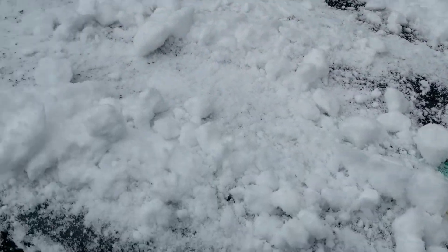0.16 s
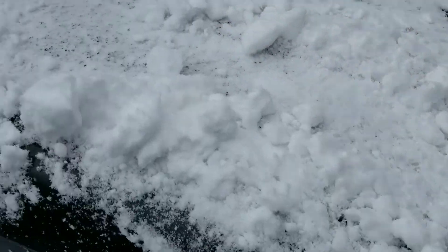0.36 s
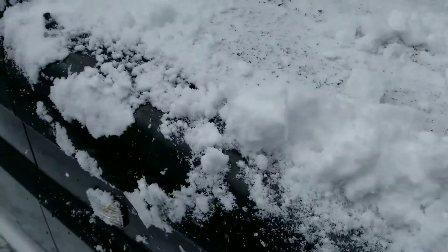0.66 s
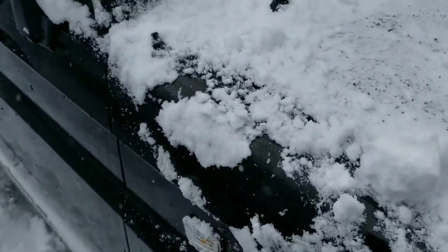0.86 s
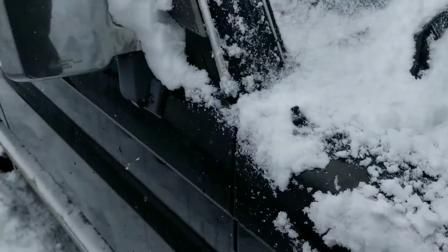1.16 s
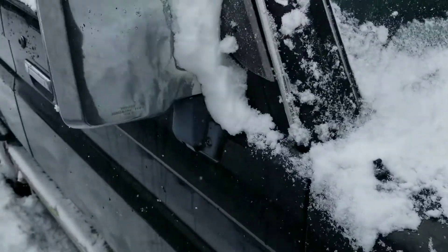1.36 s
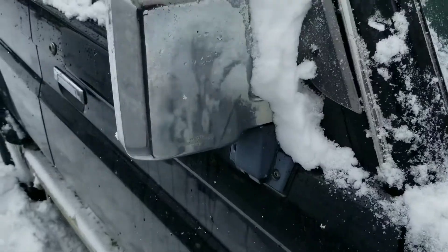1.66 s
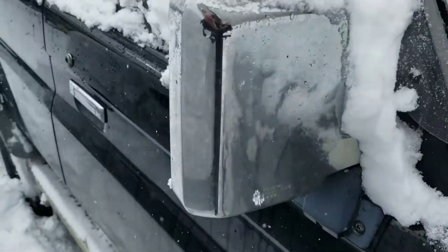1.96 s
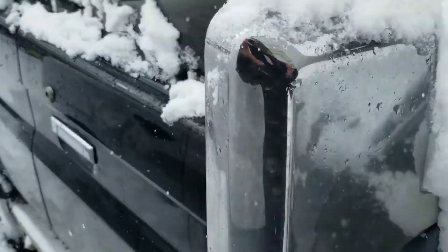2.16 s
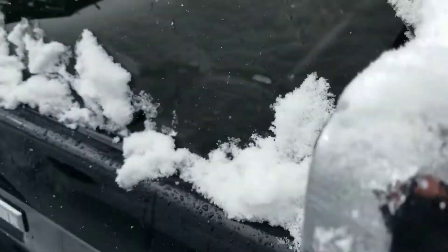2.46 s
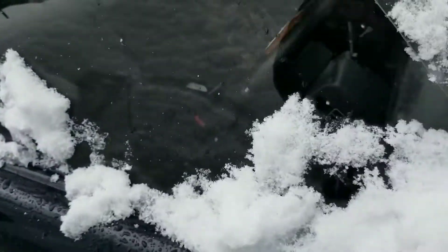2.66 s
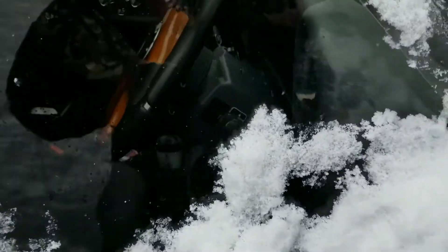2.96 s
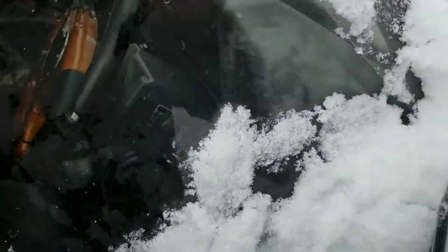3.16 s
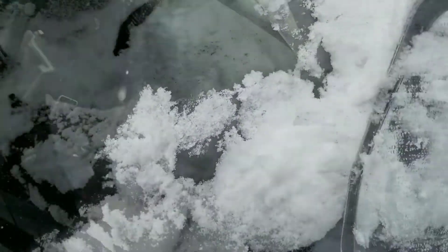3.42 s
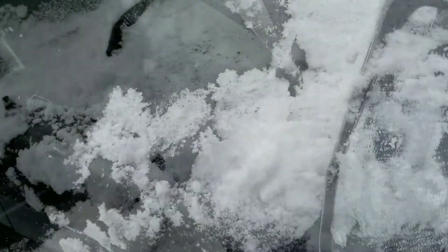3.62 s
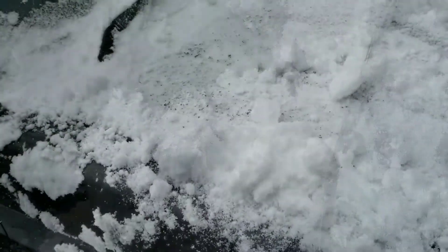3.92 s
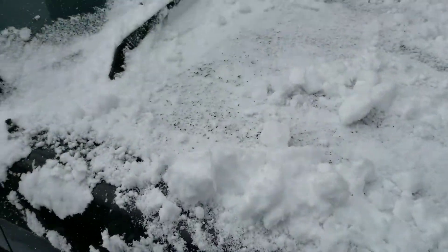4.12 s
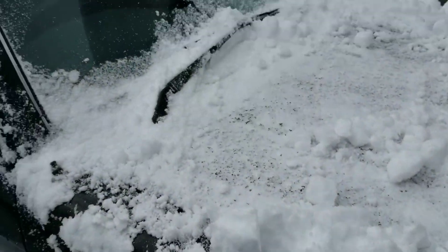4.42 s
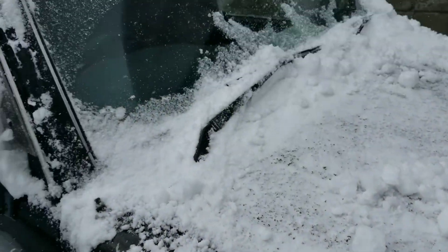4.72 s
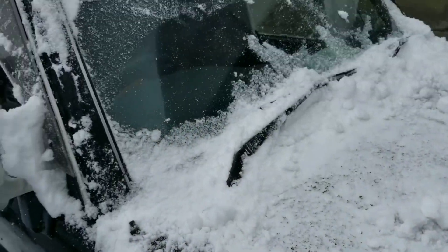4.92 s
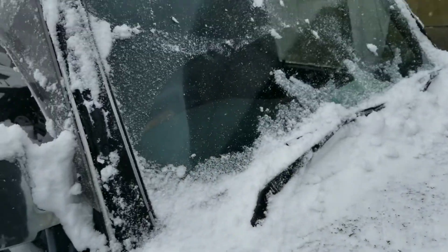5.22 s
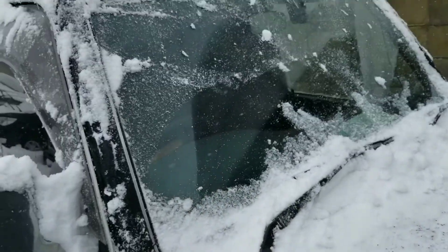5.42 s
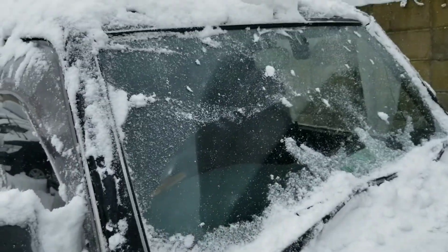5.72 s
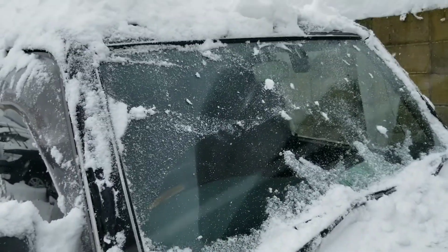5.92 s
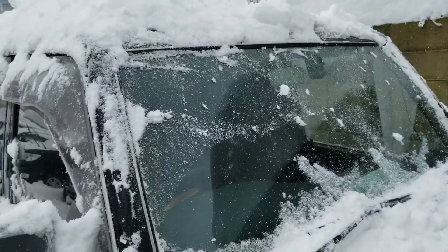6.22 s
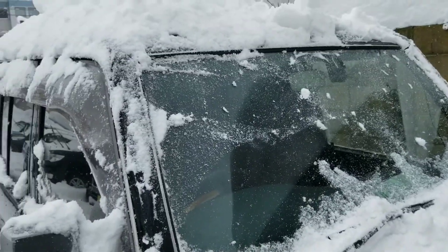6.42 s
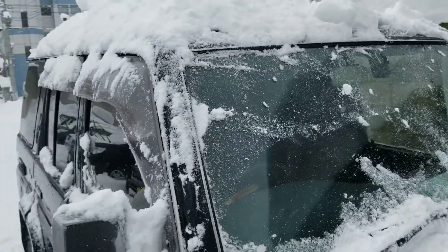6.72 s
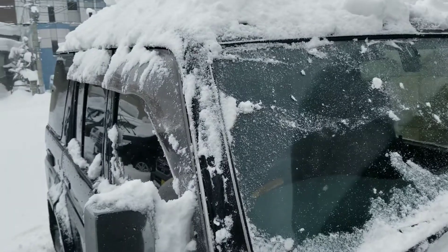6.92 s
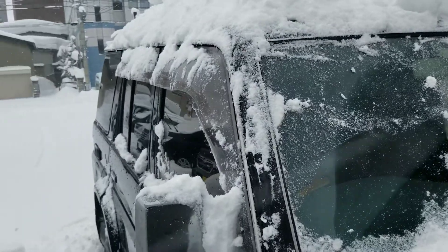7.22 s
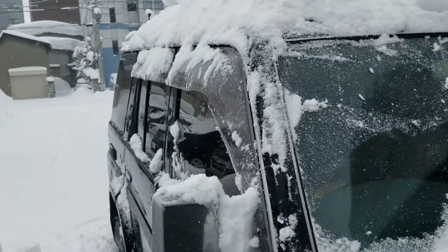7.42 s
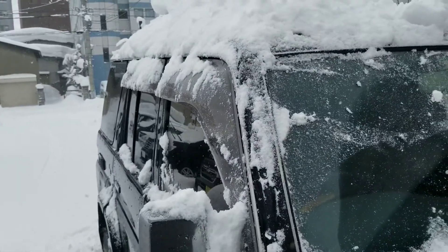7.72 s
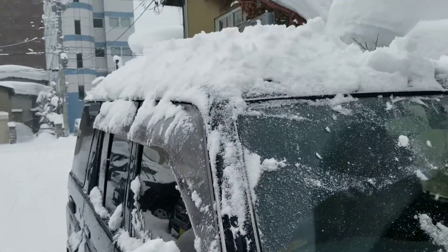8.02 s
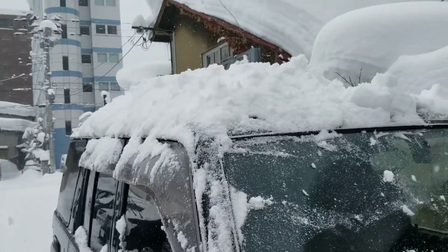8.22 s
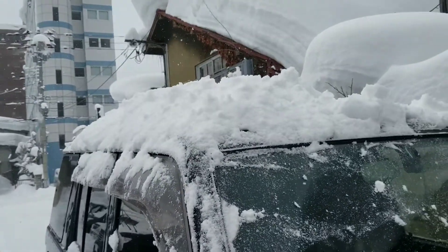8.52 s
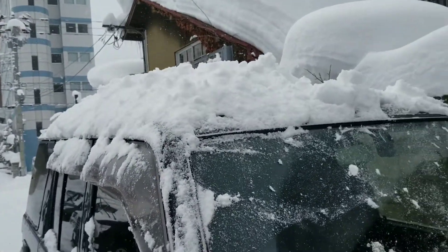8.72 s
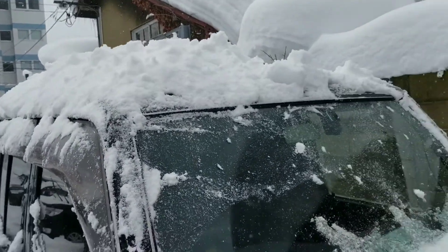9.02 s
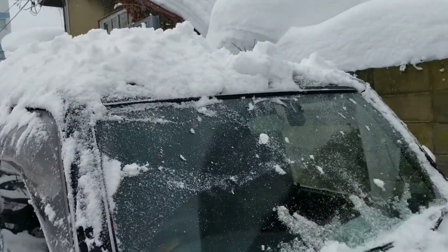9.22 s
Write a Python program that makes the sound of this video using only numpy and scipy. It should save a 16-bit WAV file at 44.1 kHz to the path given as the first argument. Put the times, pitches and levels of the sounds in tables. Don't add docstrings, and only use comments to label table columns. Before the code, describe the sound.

A four-cylinder engine idles outdoors throughout, about twenty-five firings per second, each a low exhaust thump, a ringing metallic knock and a puff of intake hiss, with slightly uneven strengths. From 0 to 1.2 seconds the handheld stereo microphones are over the bonnet, close and clattery; by 2.0 they are beside the door, the knocks softer and more blurred, the tone shifting as the hand tilts. Light finger taps fall near 2.05, 2.46, 3.1 to 3.25 and 3.5. At 3.61 a tiny silence marks a scene change. From 3.64 to 3.8 hard, dull, distorted blows hit the right side, the strongest around 3.77, with rubbing that slides briefly left and fades. The engine continues noticeably quieter, with small grip bumps and momentary bass thinning, until about 6.0, when its level steps up and climbs to full by about 6.8. The idle then runs steadily to the end near 9.4.

```python
import sys
import numpy as np
from scipy import signal
from scipy.fft import rfft, irfft
from scipy.io import wavfile
from scipy.ndimage import uniform_filter1d

SR = 44100
rng = np.random.default_rng(int(sys.argv[2]) if len(sys.argv) > 2 else 0)


def makeup_ratio(level_db):
    decades = np.asarray(level_db, float) / 20
    return 10 ** decades


def transcribe(signal):
    frames = np.atleast_2d(signal).T
    limited = np.clip(frames, -1, 1)
    pcm = np.round(limited * 32767).astype(np.int16)
    wavfile.write(sys.argv[1], SR, pcm)


N = 413216
FIRING_HZ = 25.47
FIRST_FIRING_S = (.0325, 3.6237)
GAP_S = (3.6106, 3.6326)


def firings(t):
    before = t < GAP_S[1]
    return FIRING_HZ * (t - np.where(before, *FIRST_FIRING_S)) + np.where(before, 4, 200)


# multiple of the firing rate [1], level/dB at the three places
EXHAUST = [(1, -12.5, -7, -13), (2, -2, 0.5, 0.5), (3, -6.5, -13, -8), (4, -3.5, -11, -7),
           (5, -11.5, -15, -11.5), (6, -16, -16.5, -23.5), (7, -12, -17, -16), (8, -19.5, -65, -44),
           (9, -49, -14.5, -48), (10, -21.5, -13, -22.5), (12, -16.5, -41, -17.5), (13, -32, -17.5, -54),
           (14, -50, -15.5, -21.5), (15, -32, -23, -61), (19, -56, -27, -20.5), (20, -31, -22.5, -20),
           (22, -44, -28, -20.5)]


def exhaust(cycles, thump_db, rumble_db):
    out = np.zeros((2, N))
    for k, *place_db in EXHAUST:
        low = k < 3
        if low:
            base_db, waver_db, lateness = thump_db + 3.5, by_place([1.5, 1.5, 2.6]), 1
        else:
            base_db, waver_db, lateness = rumble_db + 7.5, 3.0 if k < 18 else 1.2, .07
        gain = makeup_ratio(by_place(place_db) + base_db + waver_db * drift(5.7))
        turn = k * cycles + .11 * k * (k - 1) * lateness + .014 * np.sqrt(k) * drift(2.5)
        lag = np.outer([k * FIRING_HZ, 0], by_place(LEFT_LAG_S))
        out += gain * np.cos(2 * np.pi * (turn - lag))
    return out


# f/Hz, level/dB per Hz
RUMBLE = [(18, -47), (30, -39), (65, 5.5), (220, -7), (378, -12), (442, -12.5), (502, -5), (649, -29.5),
          (900, -17), (1170, -50), (1980, -120)]


def rumble(cycles):
    def swell(hz):
        return beat(cycles, 0.0053, 0.005, 1.0, 6.0) * makeup_ratio(2.25 * drift(1.75))
    return banded_noise(RUMBLE, swell, per_octave=2)


# f/Hz, width [Hz], level/dB at the three places
BLOCK = [(288.3, 26, -1.5, 6, -7), (375.6, 45, 0, 1.5, 1), (499.7, 21.5, -5, -9, -3),
         (580, 93, -8.5, -8, -11.5), (797.2, 36, -6.5, -3, -8), (1018, 26, -20.5, -5, -8.5),
         (1251, 57, -8, -37, -17), (1344, 140, -10, -38, -29), (1429, 42, -7.5, -13.5, -8.5),
         (1586, 37, -12.5, -9, -12.5), (1750, 78, -48, -7.5, -26), (1918, 55, -14.5, -7.5, -9.5),
         (2040, 190, -33, -28, -29), (2196, 69, -12.5, -7.5, -15.5), (2340, 93, -12, -6.5, -17.5),
         (2531, 55, -14.5, -11, -15), (2560, 210, -16, -24, -17.5)]
# f/Hz, level/dB per Hz
CLATTER = [(350, -5), (600, 4.5), (1000, -1.5), (1110, 2.5), (1330, 1.5), (1760, -1.5), (1940, 5.5),
           (3400, -36), (4420, -52), (7480, -120)]
# f/Hz, lead [firing cycles]
KNOCK_LEAD = [(400, -.13), (600, -.11), (900, -.01), (1300, .075), (2200, .02)]
RING_DB = [-4.5, -1, -4]
TICK_SHARE = [.4, .15, .35]


def knock(cycles):
    rings, blur = 0, by_place([.65, 2.3, .75])
    for hz, width_hz, *place_db in BLOCK:
        late = cycles - rng.uniform(-.02, .04) + at_hz(KNOCK_LEAD, hz)
        blows = np.diff(np.floor(late), prepend=3) == 1
        steady = .8 * np.exp(-(np.log(hz / 560) / .5) ** 2)
        envelope = beat(late, .0011, .007, .08 * blur, 1.5, hz)
        burst = rms_one(rng.standard_normal((3, N)) * envelope * makeup_ratio(1.2 * drift(4.0)))
        shake = (1 - steady) * burst + steady * rms_one(blows * strengths(late, 1.5))
        if hz > 900:
            sign = rng.choice([-1, 1], 400)[late.astype(int)]
            tick = blows * sign * strengths(late, 5.5) * hardness(late, hz)
            share = by_place(TICK_SHARE)
            shake = (1 - share) * shake + share * rms_one(tick)
        ringing = resonance(resonance(shake, hz, width_hz), hz, 4 * width_hz)
        stereo = rms_one(pair(ringing[0], ringing[1:], hz))
        rings = rings + makeup_ratio(by_place(place_db)) * reflection(hz) * stereo

    def rattle(hz):
        return beat(cycles + at_hz(KNOCK_LEAD, hz), .0015, .012, .36 * blur, 3.2, hz) * reflection(hz)
    broad = banded_noise(CLATTER, rattle, per_octave=4)
    return (makeup_ratio(by_place(RING_DB)) * rings + makeup_ratio(-0.5) * broad) * makeup_ratio(0.78 * drift(4.9))


CYLINDER_DB = [-0.9, -1.15, -0.59, -0.4]


def strengths(cycles, uneven_db):
    chance = np.clip(rng.standard_normal(400), -1.8, 1.8)
    return makeup_ratio(np.tile(CYLINDER_DB, 100) + uneven_db * chance)[cycles.astype(int)]


# lower block level/dB, upper block level/dB
CYLINDER_COLOUR = [
    [(0.5, 0), (-.8, -2), (-2, -4.7), (-0.5, 0)],
    [(0.5, 3), (-1, 1.5), (1.3, 1.5), (0.7, 0.5)],
]
# t/s, lower block level/dB, upper block level/dB
HARD_FIRINGS = [(0.032, 3, -0.5), (0.072, 1, -7), (0.19, 5.5, 0), (0.268, 2.5, -2), (0.386, -2, 0),
                (0.425, 3, -5.5), (0.504, 3.5, 1.5), (0.582, 3.5, 5), (0.7, -4.0, 2), (0.739, 3.5, 3.5),
                (0.896, 0, 3.5), (1.014, -2, 2), (1.053, 0.0, -1), (1.132, -0.5, 0.5), (1.25, 0.0, -0.5),
                (1.367, 0, -2), (1.407, -6, -2.5), (1.446, 0, 2.0), (1.485, -9, 1.0), (1.524, 2.5, 3),
                (1.603, 2, 5.5), (1.681, 4.5, -5), (1.76, 4, 3), (1.878, -8, -1), (1.996, 2.5, -0.5),
                (2.035, -6, -3), (2.074, -11, -1), (2.113, -5.0, 1.5), (2.231, 2, 2.5), (2.27, 2.5, -1.5),
                (2.31, -2, -4.5), (2.427, 4, 2.5), (2.545, 4, -2), (2.585, 1, 2.0), (2.624, -6, -5.5),
                (2.663, -2.5, -6.0), (2.702, -1, -5.5), (2.859, 0, 2.0), (2.899, -6, 2.5), (3.056, -5, 3.5),
                (3.095, 3, 4.0), (3.134, 4.0, 0), (3.409, 5, 0), (3.448, 0.5, -5), (3.527, 1.0, 3.5)]
# t/s, lower block level/dB, upper block level/dB
LATER_HARD_FIRINGS = [(3.899, 4, 3.5), (3.938, 0, 3.5), (4.016, 4.5, -4.0), (4.134, -1, 2.5), (4.173, 3, 0),
                      (4.213, 2.0, 3), (4.252, 2, 0), (4.291, 0, 2), (4.33, 5.5, 3.5), (4.487, 1.5, 1),
                      (4.684, 4, 0.0), (4.723, 5.5, 3.5), (4.841, 2, -4.0), (4.88, 0, 2.5),
                      (5.037, -0.5, 4), (5.076, 1, 5.5), (5.194, 1, 6.5), (5.273, 3.5, -8),
                      (5.39, 1.5, 2.5), (5.43, 2.5, -5.5), (5.665, 0, 1.0), (5.744, 3.5, -2),
                      (5.783, 1, 5.5), (5.901, 2, -6.0), (6.019, 0, -5.5), (6.136, -2, 4.5),
                      (6.215, 2.5, 1.5), (6.294, -3, 3), (6.411, 1.5, 1), (6.529, 1, -1), (6.568, 0.0, 3.0),
                      (6.608, 0, 3.5), (6.765, 0.5, 7.5), (6.843, -2.5, -2), (6.922, 3, 3), (7.314, 0, -2),
                      (7.354, 3, -2), (7.432, 2.5, 1.5), (7.628, 0.5, -4.5), (7.668, 4, 3), (7.707, -3, 2),
                      (7.785, -1.5, -2.5), (7.864, -4, -1), (7.982, 1.5, -1.0), (8.021, 0, 2),
                      (8.06, 3.5, 3.0), (8.139, 2, 0), (8.178, -1, 2.5), (8.296, 2.5, 2), (8.335, 2.5, 4),
                      (8.374, -2, 1), (8.414, 4, 3), (8.571, 3, -3.0), (8.649, -2, 4.5), (8.688, -1, 2.5),
                      (8.728, 1, -6), (8.806, -4, 0.0), (8.846, 0, 5.5), (8.885, 3.5, 2), (9.199, 4, 2)]


def hardness(cycles, hz):
    upper, count = int(hz > 1700), np.arange(400)
    extra_db = np.array(CYLINDER_COLOUR)[(count >= 200) * 1, count % 4, upper]
    s, *hard_db = np.vstack([HARD_FIRINGS, LATER_HARD_FIRINGS]).T
    extra_db[np.round(firings(s)).astype(int)] = 1.84 * hard_db[upper]
    return makeup_ratio(extra_db)[cycles.astype(int)]


def beat(cycles, rise_s, fall_s, between, uneven_db, hz=0):
    since = cycles % 1 / FIRING_HZ
    hard = hardness(cycles, hz) if hz > 900 else 1
    pulse = (1 - np.exp(-since / rise_s)) ** 2 * np.exp(-since / fall_s)
    return between + hard * strengths(cycles, uneven_db) * pulse


# t/s, favoured f/Hz
REFLECTION = [
    (0.0, 1510),
    (0.63, 1490),
    (0.8, 1780),
    (1.23, 1520),
    (2.19, 1970),
    (2.33, 1640),
    (2.44, 2000),
    (3.54, 1940),
    (3.6, 2150),
]


def reflection(hz):
    s, favoured_hz = np.transpose(REFLECTION)
    t = np.arange(0, N, 256) / SR
    octaves_off = np.log2(hz / np.interp(t, s, favoured_hz))
    lift = np.exp(-(octaves_off / 0.16) ** 2)
    lift_db = by_place([0.5, 4.5, -0.3])[::256] * lift
    return np.interp(np.arange(N) / SR, t, makeup_ratio(lift_db))


# f/Hz, level/dB per Hz
RUB_COLOUR = [(24, -50), (40, 13), (247, -2.5), (395, -18), (446, -19), (923, -28), (1090, -43),
              (1500, -29), (1950, -65), (3300, -120)]


def rubbing():
    t, let_go_s = np.arange(N) / SR, 0.1
    since = t - 3.8
    rub_db = -30 - 5 * np.clip(since / let_go_s, 0, 1) - 6.5 * np.clip(since, 0, None)
    pan_db = np.interp(since / let_go_s, [0, .3, .7, 1.3], [-17, 8, 8, -2])
    colour = makeup_ratio(at_hz(RUB_COLOUR, np.linspace(1, SR / 2, N // 2 + 1)))
    spectrum = rfft(rng.standard_normal((2, N))) * colour
    lumps = makeup_ratio(4 * np.tanh([drift(30.0), drift(30.0)]))
    out = rms_one(irfft(spectrum, N) * lumps) * makeup_ratio(rub_db + np.outer([.5, -.5], pan_db))
    return out * np.clip((t - GAP_S[1]) / .04, 0, 1) ** 2


# t/s, peak level/dB, f/Hz, push 1 or pull -1
TAPS = [(2.016, -25, 795, -1), (2.045, -25.5, 755, -1), (2.057, -35, 800, 1), (2.079, -33, 846, 1),
        (2.087, -32, 746, 1), (2.459, -36, 850, 1), (2.459, -30, 1950, 1), (3.1115, -25.5, 770, 1),
        (3.145, -29, 420, -1), (3.1108, -23, 230, -1), (3.14, -21, 199, -1), (3.533, -38, 5500, 1),
        (3.208, -21, 214, 1), (3.23, -21, 165, 1), (3.241, -22.5, 166, 1), (3.533, -37, 2040, 1)]
# t/s, peak level/dB, f/Hz, push 1 or pull -1, length [cycles]
BLOWS = [(3.6361, -15, 170, 1, .2), (3.639, -11, 100, -1, .25), (3.6458, -11, 170, 1, .2),
         (3.646, -24, 450, 1, .3), (3.651, -23, 130, -1, .4), (3.6875, -20, 105, 1, 1.1),
         (3.659, -24, 90, 1, .3), (3.6787, -24, 220, 1, .4), (3.682, -26, 150, -1, .3),
         (3.7035, -22, 250, 1, .3), (3.7165, -25, 250, 1, .4), (3.7225, -23, 150, -1, .4),
         (3.726, -24, 140, 1, .3), (3.7368, -24, 220, -1, .3), (3.6999, -18, 150, -1, .5),
         (3.735, -20, 400, 1, .9), (3.7485, -25, 600, 1, .6), (3.7522, -22, 300, -1, .4),
         (3.756, -23, 130, 1, .4), (3.7607, -19, 200, -1, .3), (3.7745, -14, 250, 1, .3),
         (3.768, -11, 70, 1, .35), (3.785, -20, 140, 1, .6), (3.764, -11, 200, -1, .4),
         (3.7632, -33, 1300, 1, .9), (3.7712, -26, 1500, 1, .9), (3.767, -34, 1500, 1, 1.2),
         (3.7703, -15, 500, -1, .25), (3.7724, -10, 330, -1, .25), (3.7736, -14.5, 400, -1, .25),
         (3.7769, -11.5, 200, -1, .3), (3.792, -24, 250, -1, .5), (3.7956, -30, 1100, 1, .5),
         (3.801, -24, 130, 1, .4), (3.7975, -21, 200, -1, .6), (3.812, -36, 500, 1, 1.1),
         (3.852, -34, 450, 1, 1.3), (3.853, -40, 900, 1, .5), (3.7515, -33, 1200, 1, 1.1)]
# t/s, peak level/dB, f/Hz, left over right level/dB
SETTLING = [(3.661, -29, 230, 20), (3.794, -24.5, 240, 14), (3.801, -25, 150, 17), (3.832, -39, 545, 12),
            (3.8188, -30, 170, 23), (3.842, -36, 90, 23), (3.8653, -25.5, 115, 25), (3.905, -48, 1290, 10),
            (3.83, -45, 2200, 0), (3.915, -29.5, 365, -4), (4.023, -27, 127, 1), (4.077, -45, 300, -11),
            (4.136, -44, 200, -3), (4.165, -29.5, 69.5, 3), (4.332, -35, 110, -2), (4.499, -33, 88, -1),
            (4.56, -36, 141, 15), (4.68, -42, 90, 2), (4.86, -41, 800, 7), (5.04, -41.5, 400, 11),
            (5.17, -40, 130, 15), (5.189, -38.5, 109, 12), (5.227, -36, 60, 5), (5.869, -42, 730, -32),
            (6.41, -40, 800, 6)]


def bumps():
    out, t = np.zeros((2, N)), np.arange(-2000, 2000) / SR
    events = [(*row, 0.66, 0) for row in TAPS]
    events += [(*row, -35) for row in BLOWS]
    events += [(s, db, hz, 1, 0.73, pan_db) for s, db, hz, pan_db in SETTLING]
    for s, peak_db, hz, push, cycles, pan_db in events:
        swing = np.cos(2 * np.pi * hz * t) * np.exp(-(hz * t / cycles) ** 2)
        turns = 2.3 * hz * t
        swing += makeup_ratio(-12) * np.cos(2 * np.pi * turns) * np.exp(-(turns / .55) ** 2)
        louder_db = 8.0 - np.clip([[-pan_db], [pan_db]], 0, None) - 6 * np.exp(-abs(pan_db) / 8)
        at = round(s * SR)
        out[:, at - 2000:at + 2000] += np.sign(push) * makeup_ratio(peak_db + louder_db) * swing
    return out


# f/Hz, level/dB per Hz
HISS = [(1650, 0.5), (2800, 3), (3870, -4), (4830, -5), (6680, -12), (8110, 8.5), (8840, -5.5),
        (10500, -4.5), (12600, -1), (14900, -8.5), (15600, -14)]
# f/Hz, width [Hz], level/dB
TINKLE = [(4820, 1630, -2), (10600, 400, -14)]
# t/s, share of the top of the hiss lost [1]
HISS_TOP_LOSS = [(0, -0.065), (.5, .1), (3.1, -0.045), (3.3, -0.55), (3.6, -0.51), (3.64, 0.0074),
                 (6.6, 0.4), (7, 0.065), (8, .2), (9.4, 0.6)]


def hiss(cycles):
    early = cycles + .24

    def swell(hz=0):
        rise = (early % 1) ** .75
        return 1.82 + strengths(early, 5.9) * np.sin(np.pi * rise) ** 4 * makeup_ratio(2.9 * drift(30.0))
    air = banded_noise(HISS, swell)
    top = signal.sosfiltfilt(signal.butter(2, 12300, "high", fs=SR, output="sos"), air)
    air = air - in_time(HISS_TOP_LOSS)[0] * top
    parts = 0
    for hz, width_hz, db in TINKLE:
        shaken = rng.standard_normal((2, N)) * swell()
        parts = parts + makeup_ratio(db) * rms_one(resonance(shaken, hz, width_hz))
    return (air + makeup_ratio(-6.0) * rms_one(parts)) * makeup_ratio(1.17 * drift(45.0))


def banded_noise(spectrum, envelope, per_octave=3):
    low_hz, high_hz = spectrum[0][0], spectrum[-1][0]
    edges = np.geomspace(low_hz, high_hz, int(per_octave * np.log2(high_hz / low_hz)) + 2)
    out, white = 0, rng.standard_normal((2, 3, N))
    for k, (low, high) in enumerate(zip(edges, edges[1:])):
        band = signal.sosfilt(signal.butter(2, [low, high], "band", fs=SR, output="sos"), white[k % 2])
        hz = np.sqrt(low * high)
        out = out + makeup_ratio(at_hz(spectrum, hz)) * envelope(hz) * pair(band[0], band[1:], hz)
    return rms_one(out)


def resonance(x, hz, width_hz):
    r = np.exp(-np.pi * width_hz / SR)
    feedback = [1, -2 * r * np.cos(2 * np.pi * hz / SR), r * r]
    return signal.lfilter(np.array([1, 0, -1]) * (1 - r * r) / 2, feedback, x)


# f/Hz, shared part [0-1]
LIKENESS = [(50, .98), (130, .85), (300, .78), (640, .68), (1400, .62), (3000, .42), (8000, .38)]
LEFT_LAG_S = [.00012, .00025, 0.00013]


def pair(shared, own, hz):
    alike = np.clip(at_hz(LIKENESS, hz), 0, 1)
    late = np.interp(np.arange(N) - by_place(LEFT_LAG_S) * SR, np.arange(N), shared)
    return np.sqrt(alike) * np.array([late, shared]) + np.sqrt(1 - alike) * own


# t/s, place [0 over the bonnet, 1 beside the door, 2 a step back]
PLACE = [
    (0, 0),
    (1.2, 0),
    (2.0, 1),
    (3.61, 1),
    (3.632, 2),
    (9.4, 2),
]


def by_place(values):
    s, place = np.transpose(PLACE)
    return np.interp(np.arange(N) / SR, s, np.interp(place, range(3), values))


def drift(rate):
    r = np.exp(-80 * np.pi * rate / SR)
    slow = signal.lfilter([1], [1, -2 * r, r * r], rng.standard_normal(N // 40 + 2002))[2000:]
    return np.interp(np.arange(N) / 40, np.arange(len(slow)), rms_one(slow))


def rms_one(x):
    return x / np.sqrt(np.mean(x ** 2) + 1e-20)


def in_time(rows):
    s, *columns = np.transpose(rows)
    return [np.interp(np.arange(N) / SR, s, c) for c in columns]


def at_hz(points, hz):
    points_hz, values = np.array(points).T
    return np.interp(np.log(hz), np.log(points_hz), values)


def automatic_gain_db():
    t = np.arange(N) / SR
    first_db, duck_db, settled_db = -6, -10.5, -0.62
    duck = first_db + (duck_db - first_db) * np.clip((t - 3.68) / 0.15, 0, 1)
    since = t - 6.023
    climb = duck + 3.5 * np.clip(since / 0.074, 0, 1) + 8 * np.clip(since, 0, None)
    return np.where(t < GAP_S[1], 0, np.minimum(climb, settled_db))


# t/s, nearness to the bonnet level/dB, openness to the tailpipe level/dB
FACING = [(0.0, 1.5, 1), (0.3, 1, -1), (1.0, 0, -1.5), (1.7, -2, -2), (2.4, -1.5, -3), (2.8, -4, -3),
          (3.3, -2, -3), (3.6, 0.5, -4), (3.64, 0.5, -4), (4.4, -1.5, -12), (5.0, -1.5, -13),
          (5.5, 1.5, -5), (6.1, -1, -8.5), (6.9, -0.5, -7.5), (7.8, 1.5, -5.5), (8.4, 0.5, -4),
          (9.4, 2.5, -5)]


def scene():
    bonnet_db, tailpipe_db = in_time(FACING)
    rumble_db = by_place([-37, -37, -37]) + 0.46 * tailpipe_db
    knock_db = by_place([-42.5, -50, -44]) + bonnet_db
    cycles = firings(np.arange(N) / SR)
    engine = exhaust(cycles, -26.5 + tailpipe_db, rumble_db)
    engine += makeup_ratio(rumble_db + 2.5) * rumble(cycles)
    engine += makeup_ratio(knock_db + 1.5) * knock(cycles)
    engine += makeup_ratio(-55.5 + bonnet_db + 3.0) * hiss(cycles)
    return makeup_ratio(automatic_gain_db()) * engine + rubbing() + bumps()


# start t/s, length [s]
GUARD_LEFT = [
    (3.915, .025),
    (4.088, .045),
    (4.445, .032),
    (4.577, .037),
]
# start t/s, length [s]
GUARD_RIGHT = [(3.82, .08), (4.045, .016), (4.82, .115), (4.983, .048), (5.05, .018), (5.102, .046),
               (5.288, .03), (5.88, .042), (5.983, .018), (6.032, .032), (6.394, .03)]


def rumble_guard(x):
    t = np.arange(N) / SR
    on = [sum((t > s) & (t < s + length) for s, length in spells) * 1. for spells in (GUARD_LEFT, GUARD_RIGHT)]
    on = uniform_filter1d(on, size=round(0.0053 * SR), axis=1)
    thin = signal.sosfiltfilt(signal.butter(3, 300, "high", fs=SR, output="sos"), x)
    return x + on * (thin - x)


def roll_off(x):
    return signal.sosfilt(signal.butter(12, 15600, fs=SR, output="sos"), x)


def record(dry):
    t = np.arange(N) / SR
    gate = np.where(t < GAP_S[0], 1, np.clip((t - GAP_S[1]) / .0006, 0, 1))
    x = rumble_guard(dry) * gate
    top = np.where(t < 3.66, 9, .5)
    x = x / (1 + (np.clip(x, 0, None) / top) ** 6) ** (1 / 6)
    top_cut = signal.cheby2(20, 40, 15640, fs=SR, output="sos")
    mix = signal.sosfilt(top_cut, np.clip(x, -1, 1))
    return roll_off(mix)


dry = scene()
out = record(dry)
transcribe(out)
```